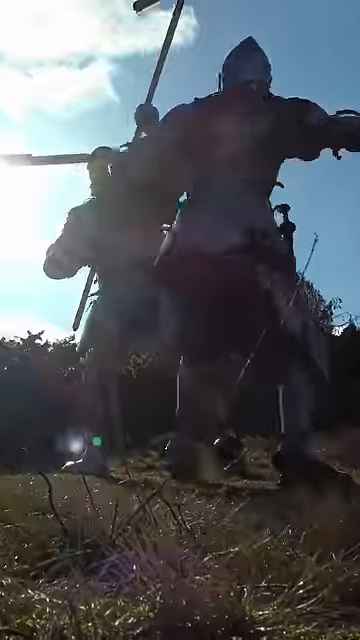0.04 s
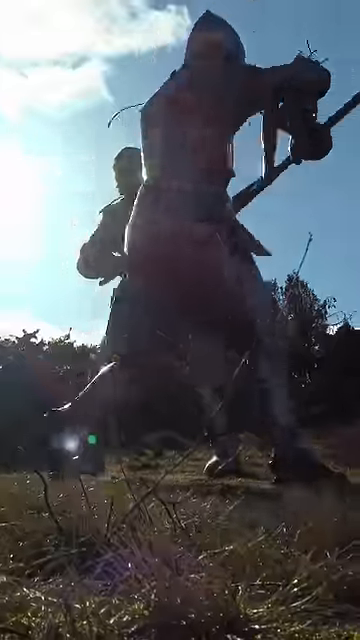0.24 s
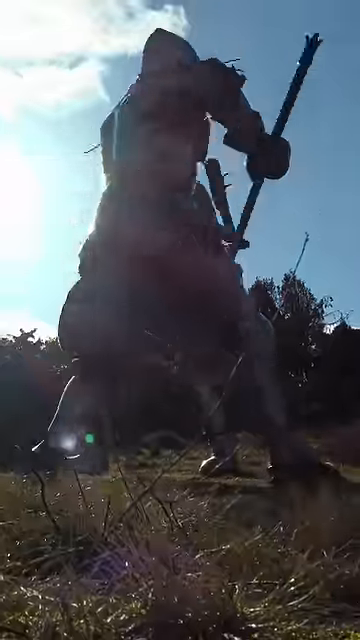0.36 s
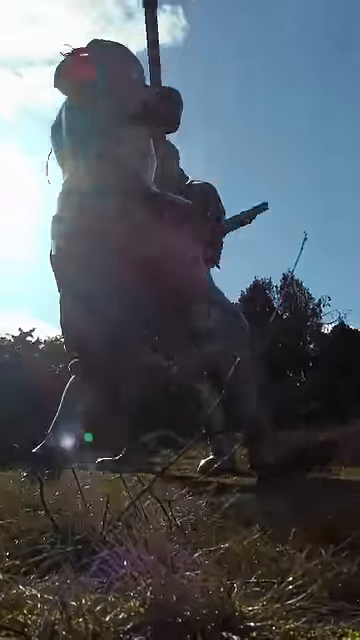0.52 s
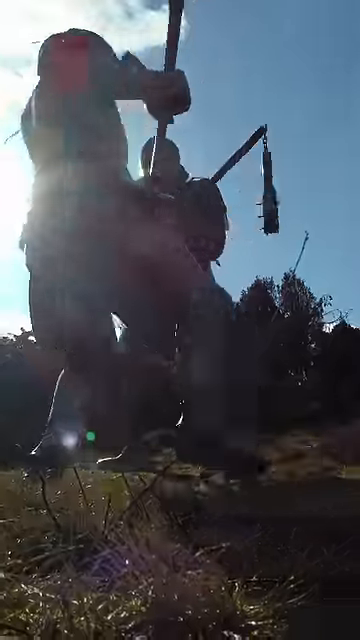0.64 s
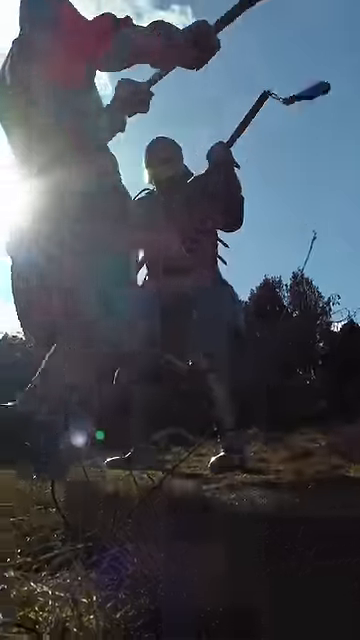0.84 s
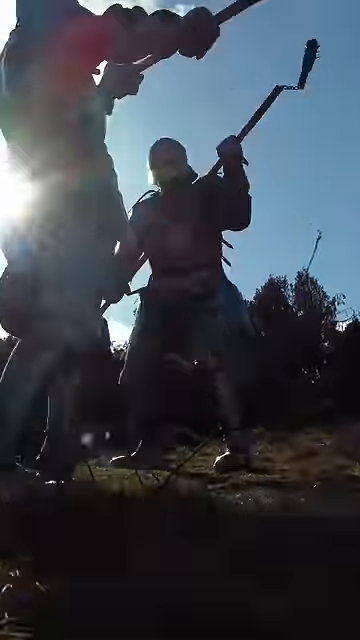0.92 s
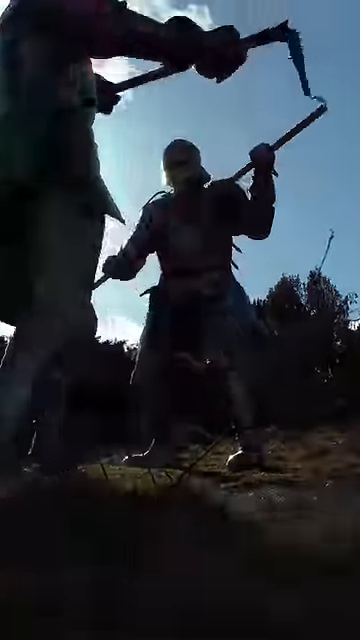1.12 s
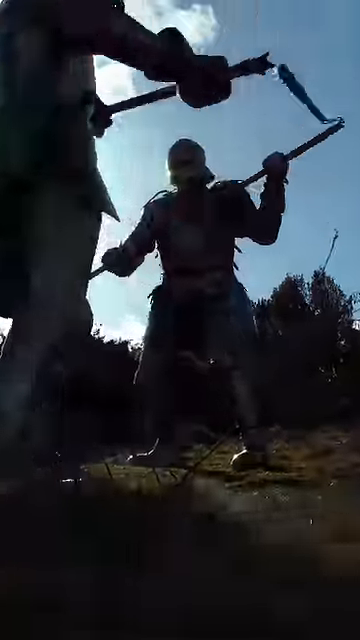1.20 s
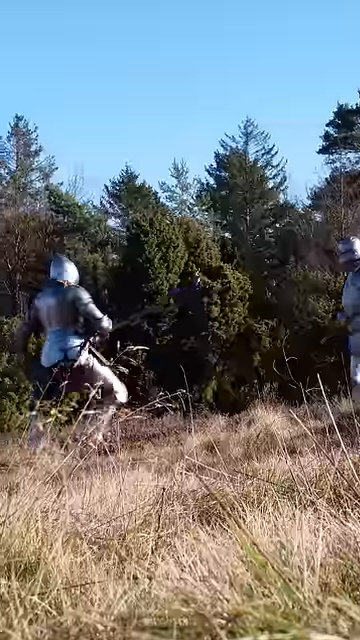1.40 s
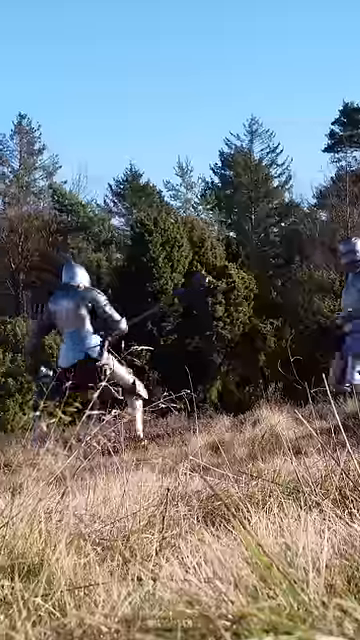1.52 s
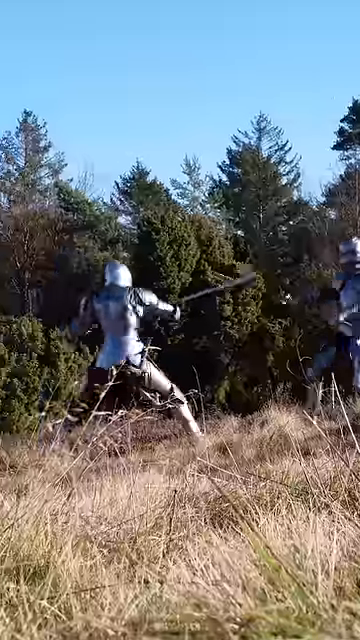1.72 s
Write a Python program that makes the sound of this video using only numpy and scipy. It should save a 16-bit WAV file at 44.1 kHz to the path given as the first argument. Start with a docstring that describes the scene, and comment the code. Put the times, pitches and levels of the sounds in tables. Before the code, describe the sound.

Plate armour rattles and crunches close by in a fight. A pole weapon cracks against it and a second blow crashes on steel. The rattle fades, then the plates clank again, over light wind in a grassy clearing.

```python
"""Two fighters in plate armour trade blows in a grassy clearing, close up, over a light wind.
Loose gear jingles from the start; plates grind, ring and snap at the edges, and feet thud on the turf.
At 0.23 s a pole weapon cracks against armour, and at 0.31 s a second blow crashes on steel.
The rattle dies down, then from 1.3 s the plates clash again and a loose one clanks twice.
Ground and trees give the whole fight a faint echo."""
import sys
import numpy as np
from scipy import signal
from scipy.fft import rfft, irfft
from scipy.io import wavfile
from scipy.ndimage import uniform_filter1d

SR = 44100
rng = np.random.default_rng(int(sys.argv[2]) if len(sys.argv) > 2 else 0)


def store_wav(level_fs):
    """Save 16-bit WAV to argv[1]."""
    pcm = np.round(np.clip(np.atleast_2d(level_fs), -1, 1) * 32767)
    wavfile.write(sys.argv[1], SR, pcm.T.astype(np.int16))


N = 77175
TIME = np.arange(N) / SR

# wind in grass and trees, with a faint narrow hiss high up: f/Hz, relative level/dB
WIND_SPECTRUM = [(20, -15.5), (90, -5), (170, 0.5), (420, -3), (700, -10), (1200, -16), (4200, -19),
                 (4750, -12), (5300, -23), (15000, -45)]
# loose straps and plates jingle as the fighters move: t/s, level/dB
JINGLE_ENVELOPE = [(0, -40), (.15, -45.5), (.40, -39.5), (.52, -42.5), (.72, -52), (1.0, -51.5),
                   (1.31, -57.5), (1.50, -44.5), (1.55, -49), (1.75, -46.5)]
# plates slap and grind together, and one footfall lands at 0.769 s: t/s, t60/s, bass/dB, midrange/dB, treble/dB
PLATE_CLASHES = [(.038, 0.11, -51, -48, -37), (0.049, 0.045, -38, -27, -32),
                 (0.072, 0.029, -56, -25.5, -34.5), (0.104, 0.023, -57, -26.5, -35.5),
                 (0.187, 0.54, -44, -35, -38.5), (0.2269, 0.023, -16.5, -9.5, -10),
                 (0.232, 0.17, -27.5, -22, -23), (0.246, 0.022, -43, -17.5, -18),
                 (0.261, 0.17, -32, -26, -24), (0.276, 0.12, -26.5, -22.5, -31), (0.305, 0.039, -11, -3, 1),
                 (0.318, 0.23, -23.5, -16.5, -17.5), (0.342, 0.032, -30, -31, -15),
                 (0.423, 0.13, -39, -23, -26.5), (0.461, 0.14, -58, -27.5, -30),
                 (0.526, 0.047, -40.5, -22.5, -24.5), (.544, 0.071, -33, -29, -32),
                 (0.561, 0.12, -33.5, -30, -36), (0.602, 0.032, -36, -31.5, -36.5),
                 (0.651, 0.14, -39, -38, -41), (0.769, 0.19, -45.5, -55, -52),
                 (0.884, 0.052, -63, -34.5, -45), (1.077, 0.035, -63, -38, -54),
                 (1.2249, 0.039, -51, -38, -41.5), (1.3169, 0.21, -39, -33.5, -32),
                 (1.343, 0.07, -36.5, -36, -42), (1.368, 0.22, -39.5, -37, -33),
                 (1.405, 0.14, -35, -29, -24.5), (1.4585, 0.16, -30.5, -29.5, -27),
                 (1.662, 0.4, -46, -45, -46), (1.739, 0.021, -54, -32.5, -41)]
# the body of a steel contact: f/Hz, relative level/dB
BASS_SPECTRUM = [(40, -33.5), (120, -14.5), (220, -7), (400, 0), (620, -0.5), (850, -6.5), (1400, -7),
                 (2500, -20.5)]
# its bite: f/Hz, relative level/dB
MID_SPECTRUM = [(300, -42), (1100, -12.5), (1700, -6.5), (2400, -2), (2900, 0), (3600, 0.5), (4700, 1),
                (5600, -1.5), (6800, -12), (12000, -22.5)]
# its sizzle: f/Hz, relative level/dB
TREBLE_SPECTRUM = [(2500, -56.5), (5200, -2), (6200, -2.5), (8600, 2), (10500, 1.5), (12500, -4),
                   (15500, -14.5)]
# the ring of the steel plates: f/Hz, relative level/dB, t60/s
ARMOUR_MODES = [(3230, -1, 0.11), (4600, -19, 0.33), (4920, -7, 0.15), (4950, -2, 0.12), (6020, 0.5, 0.23)]
# steel edges snap against each other: t/s, level before the low cut/dB, f/Hz
EDGE_SNAPS = [(0.047, -4, 4070), (0.0488, -1.5, 2210), (0.2, -5.5, 4030), (.2818, -2, 3700),
              (0.525, -4.5, 3430), (0.939, -22, 3100), (1.6868, -23, 4900)]
# short knocks of feet, padding and gear: t/s, level/dB, f/Hz, length/s
SOFT_KNOCKS = [(.196, -29.5, 490, 0.011), (0.243, -21.5, 231, 0.016), (0.306, -21, 405, 0.017),
               (1.318, -31, 1655, 0.0057), (1.458, -23.5, 593, 0.014), (1.460, -34.5, 1075, 0.027),
               (1.5105, -20, 534, 0.006), (1.675, -32.5, 310, 0.0088)]
# first blow, the weapon's shaft lands and rebounds: t/s, level/dB
SHAFT_HITS = [(.2273, 4), (.2284, 3), (.2300, 5.5)]
# the crack of the shaft and the plate under it: f/Hz, relative level/dB, t60/s
CRACK_MODES = [(680, -12, 0.011), (1507, -9, 0.017), (1917, -14, 0.017), (2256, 3, 0.0092),
               (2785, -6, 0.027), (4940, -5.5, 0.0087)]
# second blow, on a steel plate: t/s, level/dB
STEEL_HITS = [(.3066, 7.5)]
# that plate's short, bright clang: f/Hz, relative level/dB, t60/s
STEEL_MODES = [(2340, -31.5, 0.42), (3216, -19.5, 0.082), (3980, -6.5, 0.023), (4322, -5, 0.032),
               (4456, -4, 0.029), (4820, -8, 0.036), (5030, -10.5, 0.033), (5920, -7.5, 0.023)]
# a loose plate clanks against its neighbour: t/s, level/dB
LOOSE_PLATE_HITS = [(1.4085, -25.5), (1.4605, -31)]
# that plate's ring: f/Hz, relative level/dB, t60/s
LOOSE_PLATE_MODES = [(3440, -9.5, 0.13), (3700, -3.5, 0.06), (4560, -11, 0.052), (4795, -0.5, 0.097),
                     (5620, -4, 0.065)]
# the left microphone port leads the right: f/Hz, phase/rad
PORT_LEAD = [(4000, 0.085), (7000, 0.66), (10000, 0.4), (13000, 0.99)]


def from_db(db):
    """Decibels to gain."""
    return 10 ** (np.asarray(db) / 20)


def rms_one(x):
    """Scale to unit rms."""
    return x / np.sqrt(np.mean(x ** 2) + 1e-20)


def at_hz(points, hz):
    """Read a curve on a log-frequency axis."""
    f, value = np.transpose(points)
    return np.interp(np.log(hz + 0.00078), np.log(f), value)


def colour(x, spectrum, size=2048):
    """Minimum-phase EQ with the given curve and unit power gain."""
    gain = from_db(at_hz(spectrum, np.fft.rfftfreq(size, 1 / SR)))
    cepstrum = irfft(np.log(gain))
    cepstrum[1:size // 2] *= 2
    cepstrum[size // 2 + 1:] = 0
    response = irfft(np.exp(rfft(cepstrum)))
    return signal.fftconvolve(x, response / np.linalg.norm(response))[:N]


def low_cut(x, hz):
    """Small, stiff things radiate little bass."""
    return signal.sosfilt(signal.butter(2, hz, "high", fs=SR, output="sos"), x)


def flutter(depth_db, per_s):
    """A gain that wanders at random."""
    drift = uniform_filter1d(rng.standard_normal(N), int(SR / per_s))
    return from_db(depth_db * rms_one(drift))


def ring(x, hz, t60):
    """A resonator: a unit click sets off a dying sine of height 1."""
    r, w = from_db(-60 / (t60 * SR)), 2 * np.pi * hz / SR
    return signal.lfilter([0, np.sin(w)], [1, -2 * r * np.cos(w), r * r], x + 1e-18)


def ping(start, hz, t60):
    """One struck mode: a dying sine."""
    age = np.maximum(TIME - start, 0)
    return np.sin(2 * np.pi * hz * age) * from_db(-60 * age / t60)


def wind(level_db=-50, side_db=-4.5):
    """A soft, low bed of air through grass and trees, spread in mid and side."""
    mid, side = (colour(rng.standard_normal(N), WIND_SPECTRUM) for _ in range(2))
    return from_db(level_db) * (mid + from_db(side_db) * side * [[1], [-1]])


def jingle_force(bass_db=-3.5, treble_db=-2.5):
    """Moving fighters keep their gear rattling: envelopes for bass, midrange and treble."""
    movement = from_db(np.interp(TIME, *np.transpose(JINGLE_ENVELOPE)))
    return from_db([[bass_db], [0], [treble_db]]) * movement * flutter(depth_db=3.5, per_s=58)


def contacts(per_s=9000, spread_db=2.5):
    """Dense, tiny steel-on-steel ticks of uneven size; rms 1."""
    sizes = from_db(spread_db * np.minimum(rng.exponential(1, N), 4))
    signs = rng.choice([-1, 1], N)
    return rms_one(sizes * signs * (rng.random(N) < per_s / SR))


def clinks(force, count=22, low_hz=1690, high_hz=6020, ring_cycles=95, level_db=-6):
    """Small overlapping plates take turns in the contact, each ringing briefly at its own pitch."""
    out = 0
    for hz in np.geomspace(low_hz, high_hz, count):
        t60 = ring_cycles / hz
        drive = force * contacts() * rms_one(flutter(depth_db=10, per_s=24))
        clink = ring(drive, hz, t60) / np.linalg.norm(ping(0, hz, t60))
        out = out + from_db(at_hz(MID_SPECTRUM, hz)) * clink
    return from_db(level_db) * out / np.sqrt(count)


def clash_power(attack_s=0.00093, hold_share=0.059):
    """Plates close, grind at full force and let go: power in bass, midrange and treble."""
    power = 0
    for start, t60, *levels_db in PLATE_CLASHES:
        age = TIME - start
        attack = np.clip(age / attack_s, 0, 1)
        decay = from_db(-60 * np.maximum(age / t60 - hold_share, 0))
        power = power + np.outer(from_db(levels_db), attack * decay) ** 2
    return power


def armour(grind_db=-1.5, ring_db=-55):
    """Jingle and clashes drive a crunch of tiny contacts that sets the plates ringing."""
    power = jingle_force() ** 2 + clash_power()
    stick_slip = rms_one(flutter(depth_db=2.01, per_s=400))
    bass, mid, treble = np.sqrt(power) * stick_slip
    body = colour(contacts() * bass, BASS_SPECTRUM)
    grind = from_db(grind_db) * colour(contacts() * mid, MID_SPECTRUM)
    sizzle = colour(contacts() * treble, TREBLE_SPECTRUM)
    crunch = body + grind + sizzle
    ringing = sum(from_db(ring_db + db) * ring(crunch, hz, t60) for hz, db, t60 in ARMOUR_MODES)
    return crunch + clinks(mid) + ringing


def snaps(t60=0.003):
    """Plate edges catch each other in single hard clicks."""
    clicks = sum(from_db(db) * ping(start, hz, t60) for start, db, hz in EDGE_SNAPS)
    return low_cut(clicks, hz=2830)


def thuds():
    """Feet, padding and gear knock softly: short tones that swell and fade."""
    out = 0
    for start, db, hz, length in SOFT_KNOCKS:
        age = TIME - start
        swell = np.sin(np.pi * np.clip(age / length, 0, 1)) ** 2
        out = out + from_db(db) * swell * np.sin(2 * np.pi * hz * age)
    return out


def strike(hits, modes):
    """Each hard hit briefly rings every mode of the struck parts."""
    ringing = sum(from_db(hit_db + mode_db) * ping(start, hz, t60)
                  for start, hit_db in hits for hz, mode_db, t60 in modes)
    return low_cut(ringing, hz=375)


def mic_ports(x):
    """The sound reaches the two microphone ports slightly out of step."""
    half_lead = np.exp(.5j * at_hz(PORT_LEAD, np.fft.rfftfreq(2 * N, 1 / SR)))
    return irfft(rfft(x, 2 * N) * np.array([half_lead, half_lead.conj()]))[:, :N]


def clearing_echo(x, level_db=-27, t60=0.13, top_hz=4800):
    """Ground and trees scatter a faint, dull tail, different on each side."""
    dull = signal.butter(1, top_hz, fs=SR)
    tails = signal.lfilter(*dull, rng.standard_normal((2, N))) * from_db(-60 * TIME / t60)
    echoes = [signal.fftconvolve(x, tail / np.linalg.norm(tail))[:N] for tail in tails]
    return from_db(level_db) * np.array(echoes)


def scene():
    """The fight up front, its echo and the wind underneath."""
    crack = strike(SHAFT_HITS, CRACK_MODES)
    crash = strike(STEEL_HITS, STEEL_MODES)
    clanks = strike(LOOSE_PLATE_HITS, LOOSE_PLATE_MODES)
    fight = armour() + snaps() + thuds() + crack + crash + clanks
    return mic_ports(fight) + clearing_echo(fight) + wind()


def record(dry):
    """The two big blows overload the microphone; a steep high cut takes off the top."""
    ceiling, cutoff_hz = 0.74, 15800
    saturated = ceiling * np.tanh(dry / ceiling)
    return signal.sosfilt(signal.cheby2(16, 60, cutoff_hz, fs=SR, output="sos"), saturated)


dry = scene()
out = record(dry)
store_wav(out)
```